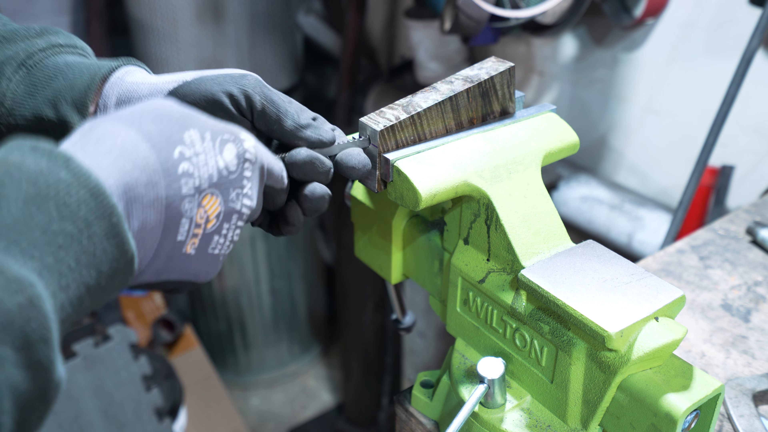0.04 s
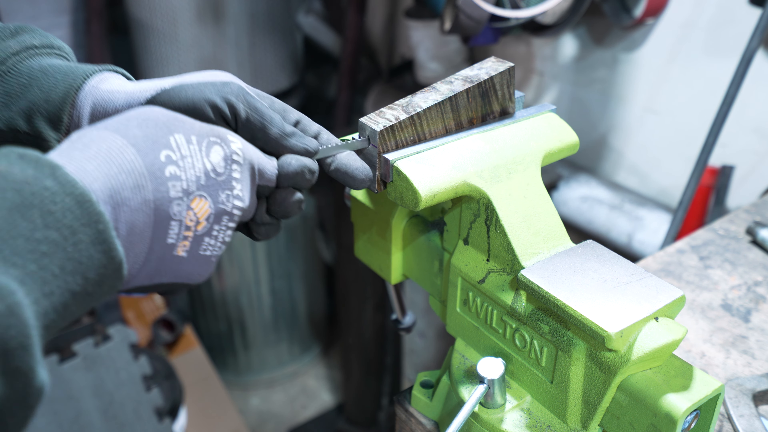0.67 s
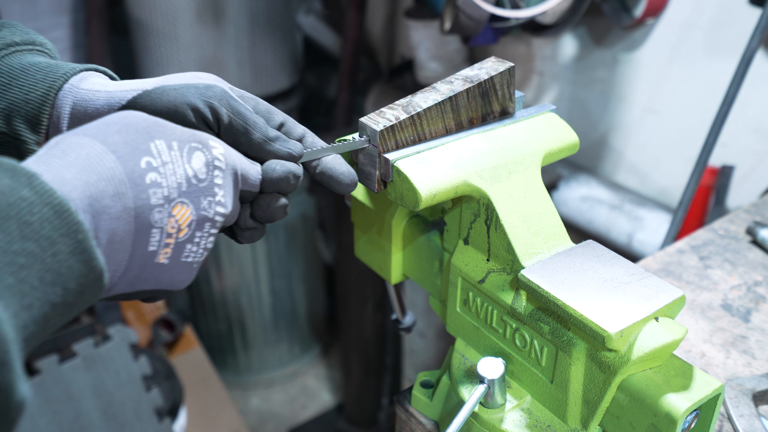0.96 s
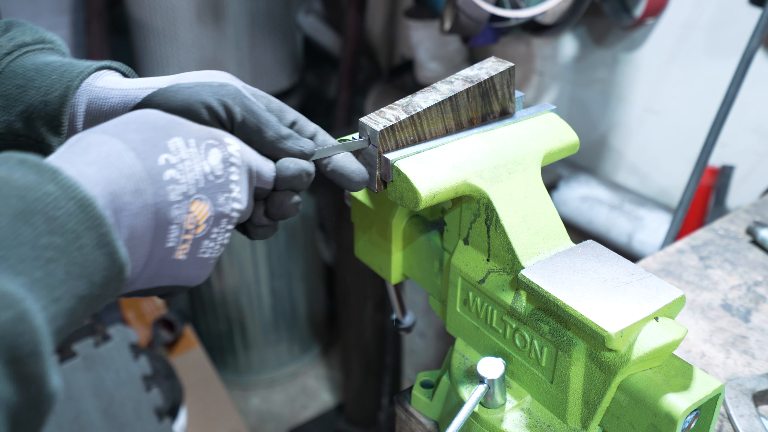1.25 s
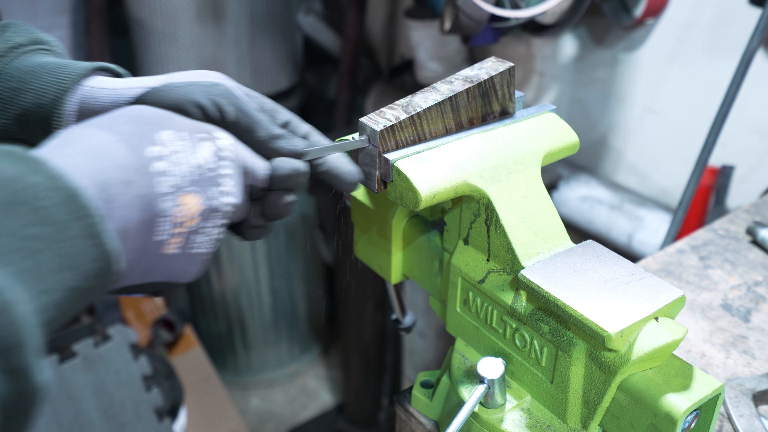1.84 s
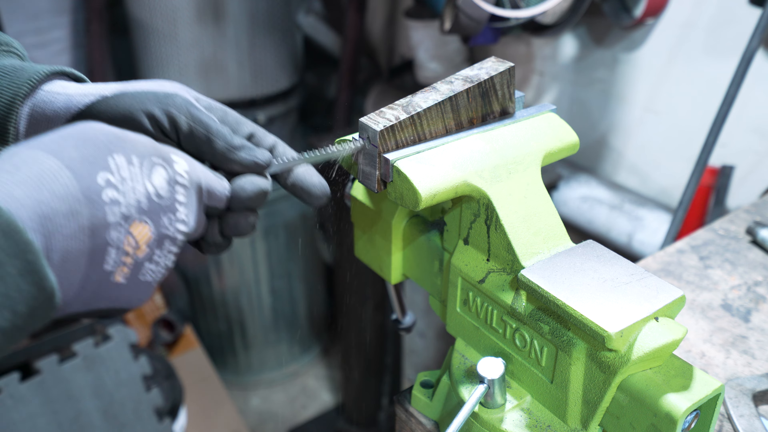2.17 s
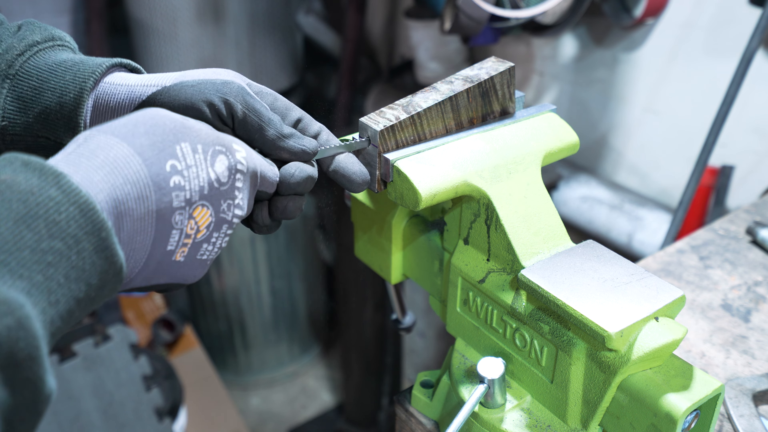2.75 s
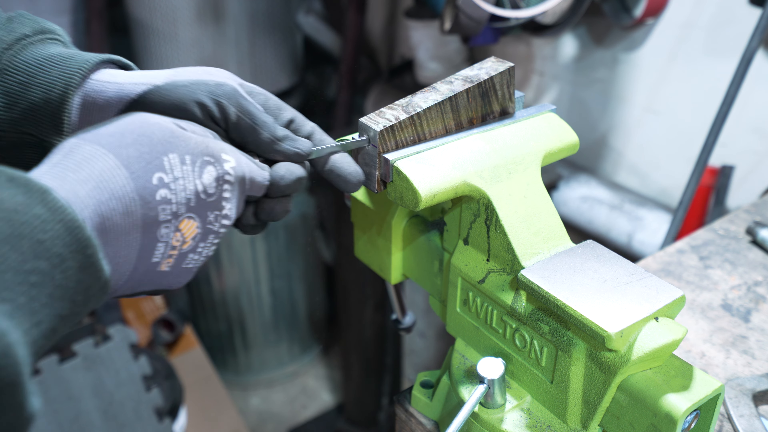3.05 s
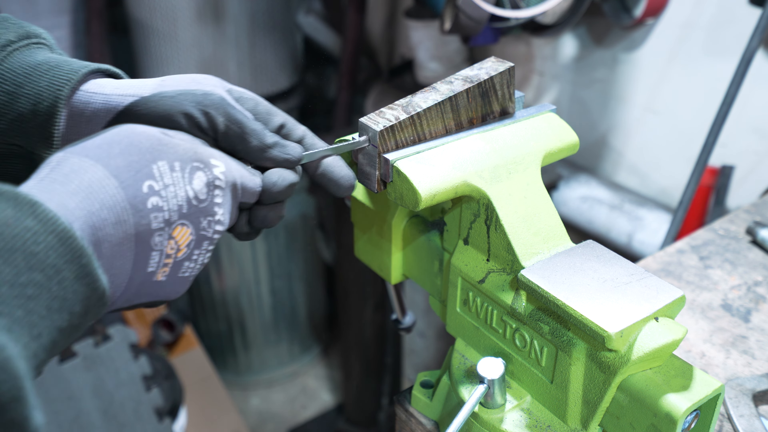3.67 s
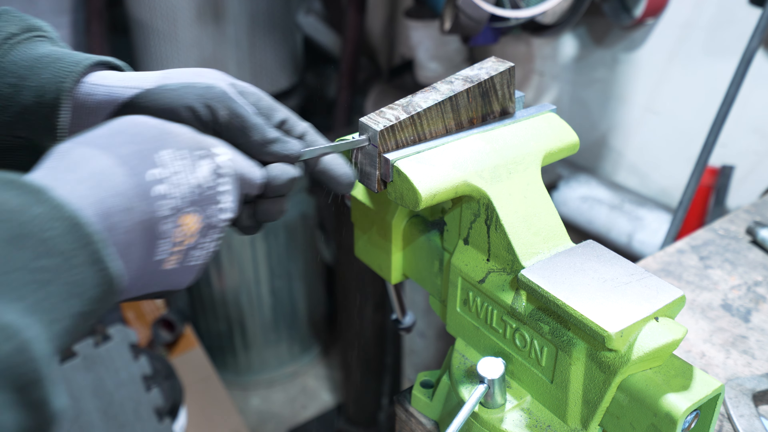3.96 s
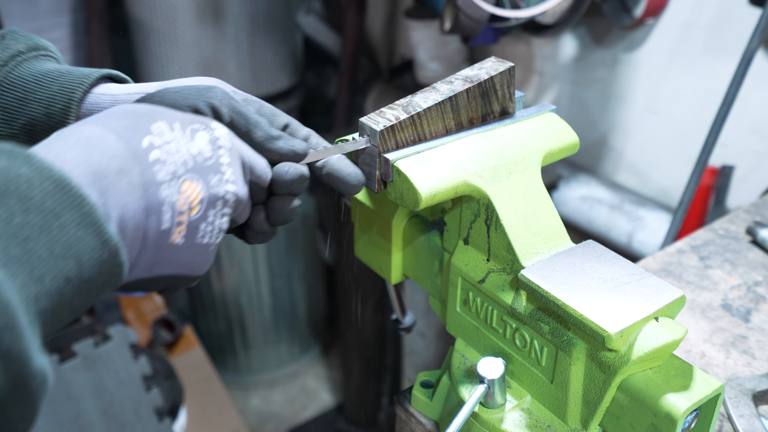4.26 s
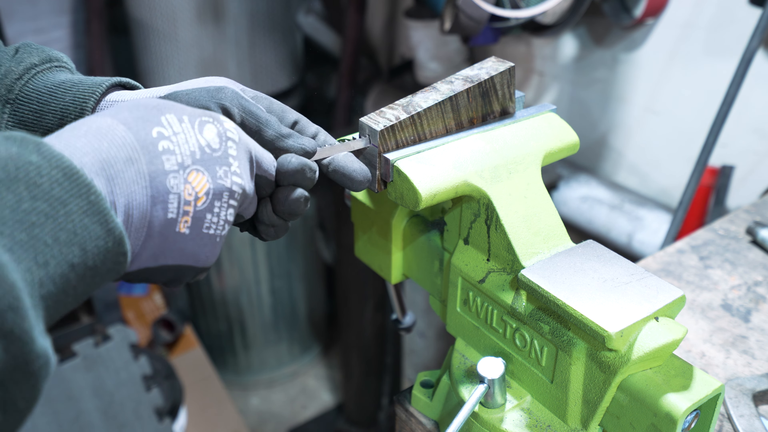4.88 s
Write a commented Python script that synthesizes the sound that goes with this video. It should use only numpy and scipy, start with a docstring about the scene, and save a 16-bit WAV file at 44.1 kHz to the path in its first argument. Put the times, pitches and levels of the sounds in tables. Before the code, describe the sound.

A small toothed hand tool rasps back and forth in a hole in a wooden block held in a bench vice, about five scratchy pushes a second. It jams with dull knocks and faint creaks while the bench rumbles softly. The strokes pause midway with two small snaps, resume, then weaken amid a few ticks and a sharp snap. The workshop is small and quiet, with faint microphone hiss.

```python
"""Broaching a wooden block

A small hand broach rasps in a hole in a block held in a bench vice: about five pushes a second, with
lighter pulls between. Its teeth tear fibres, which hiss and excite the modes of shank, block and vice.
The tool creaks, jams and knocks; the bench thuds and rumbles. A few snaps and ticks fall midway and near
the end. The workshop is small and quiet; the microphone hisses and whines faintly."""
import sys
import numpy as np
from scipy import signal
from scipy.fft import rfft, irfft
from scipy.io import wavfile

SR = 44100
rng = np.random.default_rng(int(sys.argv[2]) if len(sys.argv) > 2 else 0)


def dump(signal):
    """Clip the signal to [-1, 1] and save it as 16-bit WAV at the path in sys.argv[1]."""
    limited = np.clip(np.atleast_2d(signal).T, -1, 1)
    pcm = np.round(limited * 32767).astype(np.int16)
    wavfile.write(sys.argv[1], SR, pcm)


N = 225425
TIME = np.arange(N) / SR


# cutting pushes: t/s, hold/s, rasp level/dB, hiss/dB re rasp, vice shudder/dB re rasp
PUSHES = [(0.031, 0.0064, -64, 2.5, 13.5), (0.722, 0.033, -57, -8, 15), (0.905, 0.02, -54, -6, 11),
          (1.093, .014, -49.5, -9.5, 9), (1.284, 0.025, -55, -9, 12.5), (1.463, 0.023, -53.5, -8, 8.5),
          (1.657, 0.035, -52.5, -5, 11.5), (1.859, 0.033, -50, -2.5, 10), (2.081, 0.04, -55.5, -3, 1),
          (2.65, 0.026, -60, -7.5, 6.5), (3.058, 0.023, -52.5, -6.5, 13.5), (3.247, 0.04, -59.5, -5, 10),
          (3.446, 0.041, -54, -7, 11), (3.649, 0.055, -54, -6, 12), (3.867, 0.032, -50.5, -4.5, 6.5),
          (4.092, 0.057, -63.5, -2.5, 5.5), (4.416, 0.0066, -68, 0, 12.5), (4.569, 0.035, -70, -6, 13.5),
          (4.775, 0.0073, -66.5, -1.5, 10.5), (4.957, 0.028, -61, -11, 3.5)]
# lighter pulls back: t/s, rasp level/dB
PULLS = [(0.805, -71), (1.008, -64), (1.193, -61.5), (1.38, -65), (1.563, -62), (1.755, -61), (1.968, -56),
         (2.82, -70.5), (2.955, -66.5), (3.15, -62.5), (3.355, -64), (3.552, -62), (3.76, -59),
         (3.976, -59.5), (4.225, -68), (5.055, -73)]
# a tooth catches and a bundle of fibres cracks at once: t/s, rasp level/dB, hiss/dB re rasp
CRACKS = [(0.917, -45, -11), (1.107, -49, -8), (1.302, -47.5, -8), (1.481, -48, -5.5), (2.226, -53.5, -10),
          (2.654, -53.5, -14), (2.863, -60.5, -5), (3.076, -46, -3), (3.368, -56, -15), (3.477, -54, -6),
          (3.897, -43.5, -15)]
def bites():
    """Incoherent sources add in power: the envelopes of rasp, fibre hiss and vice shudder."""
    pull_hiss_db, pull_shudder_db, crack_shudder_db = -4.5, 9.5, 7  # re rasp
    shudder_lag_s = 0.0031  # the vice builds up after the teeth bite
    events = []
    for at, hold, *levels in PUSHES:
        depth_db = np.interp(TIME, [at, at + hold], [-2, 0])  # the teeth dig deeper; the hiss stays level
        events.append((swell(at, 0.0086, hold, 0.014), depth_db, *levels))
    events += [(swell(at, 0.014, 0.012, 0.03), 0, db, pull_hiss_db, pull_shudder_db) for at, db in PULLS]
    events += [(swell(at, 0.0013, 0, 0.011), 0, db, hiss_db, crack_shudder_db)
               for at, db, hiss_db in CRACKS]
    rasp = hiss = shudder = 0
    for shape, depth_db, db, hiss_db, shudder_db in events:
        cut = shape * undb(db + depth_db) ** 2
        rasp += cut
        hiss += shape * undb(db + hiss_db) ** 2
        shudder += cut * undb(shudder_db) ** 2
    return rasp, hiss, np.interp(TIME - shudder_lag_s, TIME, shudder)


# spectrum of tearing fibres: f/Hz, level/dB
FIBRE_HISS = [(1500, -7), (2750, 2.5), (3100, -0.5), (3400, -6), (4000, -1.5), (5300, 0.5), (6000, 1),
              (8400, 3.5), (9200, -2), (10700, 3.5), (12100, -3.5), (15000, -15.5), (15800, -20)]
# modes of the steel shank: f/Hz, bandwidth/Hz, gain/dB
SHANK_MODES = [(4370, 300, -7.5), (6040, 140, 3), (7180, 80, 3.5), (7950, 870, -33), (10400, 240, -13.5),
               (11200, 340, -5.5), (12900, 3300, -1.5), (15100, 450, -12)]
# modes of the wooden block: f/Hz, bandwidth/Hz, gain/dB
BLOCK_MODES = [(850, 27, 10), (1121, 92, 10.5), (1309, 32, 12.5), (1408, 26, 20), (1554, 128, 16.5),
               (1730, 100, -20), (1650, 12, 4.5), (2100, 27, -38), (2290, 170, -21), (2830, 230, -40)]
def scraping():
    """Forced vibration: tearing fibres hiss and drive the modes of shank, block and vice."""
    rasp, hiss, shudder = bites()
    grip = chatter(hz=240, depth_db=1.5) * chatter(hz=71.5, depth_db=1)
    hiss_gain = grip * np.sqrt(hiss)
    fibres = hiss_gain * unit(colour(tearing(rate_hz=2400, spread_db=3, smooth=0.83), FIBRE_HISS))
    shank = play(hiss_gain * tearing(rate_hz=2300, spread_db=8, smooth=0.18), ring(SHANK_MODES))
    teeth = grip * tearing(rate_hz=1500, spread_db=2, smooth=0.78)
    block = soften(play(teeth * np.sqrt(rasp), ring(BLOCK_MODES)), hz=2650, order=7)
    vice = play(teeth * np.sqrt(shudder), vice_response(thud_hz=459, thud_width_hz=150, thud_db=-3.5))
    return undb(-1.3) * fibres + undb(-5) * shank + undb(-2.36) * block + undb(-4) * vice


def tearing(rate_hz, spread_db, smooth):
    """Shot noise: fibres give way in random clicks of unequal size, over smooth rubbing; rms 1."""
    breaks = rng.random(N) < rate_hz / SR
    size = np.minimum(rng.exponential(size=N), 4)
    rub = rng.standard_normal(N)
    clicks = breaks * undb(spread_db * size) * rng.choice([-1, 1], N)
    return unit(unit(clicks) + smooth * rub)


def chatter(hz, depth_db):
    """Stick-slip friction: the uneven grip modulates the amplitude at random."""
    flutter = unit(soften(rng.standard_normal(N), hz))
    return unit(undb(depth_db * flutter))


# modes of the vice: f/Hz, bandwidth/Hz, gain/dB
VICE_MODES = [(155.5, 17, -2.5), (231, 34, -2), (331, 26, 6), (334.2, 37, 11), (459.2, 12, 8.5),
              (528.5, 35, 5), (540, 57, -16), (652, 30, -46), (855, 57, -3), (860, 700, -33)]
def vice_response(thud_hz, thud_width_hz, thud_db):
    """Structure-borne delay: the vice rings at once, and a round thud follows by way of the bench."""
    bench_lag_s = 0.008624
    thud = resonate(signal.unit_impulse(SR // 4), thud_hz, thud_width_hz)
    thud = soften(resonate(thud, thud_hz, thud_width_hz), hz=758, order=5)
    age = TIME[:len(thud)]
    late = np.interp(age - bench_lag_s, age, thud / np.linalg.norm(thud), left=0)
    response = soften(ring(VICE_MODES), hz=1746, order=4) + undb(thud_db) * late
    return response / np.linalg.norm(response)


# the tool jams in the hole: t/s, level/dB, contact time/s
KNOCKS = [(.045, -54, .0005), (0.327, -57.5, 0.00024), (.935, -38, 0.00033), (1.119, -40.5, 0.00044),
          (1.21, -32, 0.0017), (1.408, -32.5, 0.0015), (1.485, -40.5, 0.00037), (1.495, -32, 0.0003),
          (1.6701, -28, 0.00026), (1.712, -39, 0.0011), (1.787, -42, 0.00057), (1.995, -31.5, 0.0013),
          (2.133, -48, 0.00038), (2.2189, -27.5, 0.00036), (2.236, -39, .0004), (2.375, -56, 0.0007),
          (2.866, -44, 0.00016), (2.955, -33, 0.0018), (3.169, -40, 0.00055), (3.3683, -29.5, 0.00032),
          (3.485, -33, 0.0008), (3.566, -30.5, 0.00056), (3.667, -36, 0.00051), (3.786, -40.5, 0.0011),
          (4.0102, -34, 0.001), (4.433, -39.5, 0.0021), (4.785, -42.5, 0.0017), (5.063, -41.5, 0.00075)]
def knocking():
    """Impulse excitation: each jam is one short push on the vice."""
    return undb(2) * strike(KNOCKS, vice_response(thud_hz=401, thud_width_hz=440, thud_db=3.5))


# dull ticks with a soft thump: t/s, level/dB, contact time/s
TICKS = [(4.3674, -37.5, 0.00025), (4.3932, -28, 0.00032)]
# their modes: f/Hz, bandwidth/Hz, gain/dB
TICK_MODES = [(74, 75, 7.5), (150, 200, 4.5), (1190, 370, 2), (1780, 630, -29)]
# snaps, like splinters breaking: t/s, level/dB, contact time/s
SNAPS = [(2.452, -43, 0.00046), (2.508, -40, 0.00048), (4.6546, -27, 0.000052), (4.6566, -38, 0.000076),
         (4.6642, -51, .0002)]
# their modes: f/Hz, bandwidth/Hz, gain/dB
SNAP_MODES = [(2710, 114, 3.5), (3030, 270, 4.5), (6550, 3500, -14), (9400, 780, -10), (12900, 550, -12)]
def clicking():
    """Heavy damping keeps these taps short; a source as small as a splinter radiates little bass."""
    splinter = ring(SNAP_MODES)
    bass = soften(splinter, hz=1500, order=1)
    return strike(TICKS, ring(TICK_MODES)) + strike(SNAPS, splinter - bass)


# groans of the vice and squeaks of the shank: centre t/s, half length/s, f/Hz, level/dB
CREAKS = [(0.055, 0.021, 336.8, -53), (0.762, 0.035, 346.5, -47.5), (0.961, 0.016, 344, -46.5),
          (1.307, 0.013, 516, -46.5), (1.662, 0.011, 10600, -60), (1.846, .012, 10400, -65),
          (1.96, 0.03, 8100, -70), (2.663, 0.017, 10650, -64), (2.669, 0.031, 342, -48),
          (2.839, 0.028, 361.7, -54), (3.314, 0.013, 289, -50), (3.868, 0.018, 10660, -57.5),
          (3.988, 0.015, 10600, -68), (4.595, 0.019, 339, -55.5), (4.799, 0.014, 328.7, -59),
          (4.978, 0.011, 519, -51.5)]
def creaking():
    """Self-excited oscillation: stick-slip locks onto a resonance; the pitch wavers with the grip."""
    wavering_time = np.cumsum(1 + 0.031 * unit(soften(rng.standard_normal(N), hz=211))) / SR
    grip = chatter(hz=160, depth_db=5.5)
    tones = 0
    for at, half_length, hz, db in CREAKS:
        bell = np.exp(-np.minimum(((TIME - at) / half_length) ** 2, 20))
        tones += undb(db) * np.sqrt(2) * bell * np.sin(2 * np.pi * (hz * wavering_time + rng.random()))
    return grip * tones


# how hard the hands work the bench: t/s, rumble level/dB
EFFORT = [(0, -62), (.08, -59.5), (.2, -79), (.33, -72.5), (.68, -90), (.73, -58), (1.38, -54),
          (1.54, -52.5), (2.04, -56), (2.44, -71), (2.88, -63.5), (3.15, -54), (3.9, -53), (4.42, -64.5),
          (4.52, -76), (4.6, -62), (4.78, -66.5), (5.11, -60.5)]
# modes of the bench: f/Hz, bandwidth/Hz, gain/dB
BENCH_MODES = [(54, 6.6, -16.5), (90.3, 25, -5.5), (103.5, 14, 9), (141, 25, 3), (144.3, 15, 6),
               (190, 11, 0.5)]
def rocking(sway_hz, sway_width_hz):
    """Random forcing of low modes: the hands make the bench rumble and sway; blows jolt it further."""
    rumble = unit(soften(play(rng.standard_normal(N), ring(BENCH_MODES)), hz=275, order=4))
    sway = unit(soften(resonate(rng.standard_normal(N), sway_hz, sway_width_hz), hz=71))
    effort = undb(curve(EFFORT))
    jolt_power = sum(undb(db - 23) ** 2 * swell(at, attack_s=0.0085, hold_s=0, release_s=0.047)
                     for at, db, _ in KNOCKS + TICKS)
    return np.sqrt(effort ** 2 + jolt_power) * rumble + undb(-5) * effort * sway


# the tool slides between bites: t/s, groan level/dB, rub level/dB
SLIDE = [(0, -72, -71.5), (.41, -93, -100), (.45, -66, -77), (.69, -73.5, -95), (.8, -62, -72.5),
         (1.8, -61, -64), (2.2, -73, -61), (2.4, -81.5, -79), (2.64, -61, -66), (2.82, -62, -78.5),
         (3.4, -64.5, -68), (4.22, -60.5, -66), (4.55, -70, -81), (5.11, -65, -76)]
# modes of the groaning vice: f/Hz, bandwidth/Hz, gain/dB
GROAN_MODES = [(355, 39, 4.5), (356, 110, -12)]
# spectrum of dry rubbing on wood: f/Hz, level/dB
WOOD_RUB = [(500, -4), (1000, -1), (1550, -0.5), (2000, -2.5), (2900, -6), (3300, -12), (6000, -18)]
# gloves brush along the tool: t/s, level/dB
GLOVES = [(0, -75), (.7, -92), (1.9, -78), (2.2, -91), (2.4, -86), (3.8, -81), (4.15, -72), (4.45, -71.5),
          (4.7, -73), (5.11, -105)]
# their spectrum: f/Hz, level/dB
GLOVE_HISS = [(2500, -16.5), (5500, -9.5), (6700, -3), (7500, -5), (11000, -6), (15500, -6.5)]
def sliding():
    """Sliding friction makes noise: the vice groans softly, the wood rubs and the gloves brush."""
    friction = tearing(rate_hz=380, spread_db=3.5, smooth=0.44)
    groan = unit(soften(play(friction, ring(GROAN_MODES)), hz=690, order=4))
    rub = chatter(hz=60, depth_db=3.5) * unit(colour(rng.standard_normal(N), WOOD_RUB))
    gloves = unit(colour(rng.standard_normal(N), GLOVE_HISS))
    rub_db = curve(SLIDE, column=2) - 1.5
    return undb(curve(SLIDE)) * groan + undb(rub_db) * rub + undb(curve(GLOVES)) * gloves


# spectrum of the room's tail: f/Hz, level/dB
ROOM_COLOUR = [(60, -19), (150, -18), (550, 0.5), (1000, -3.5), (2500, -2), (6000, -3), (15000, -26)]
def workshop(x, t60_s, wet_db, gap_s):
    """Reverberation: a diffuse tail, duller than the direct sound, decays exponentially."""
    age = TIME[:SR // 2]
    tail = colour(rng.standard_normal(len(age)), ROOM_COLOUR)
    onset = np.clip(age / gap_s - 1, 0, 1)
    decay = onset * np.exp(-np.log(1000) * age / t60_s)
    return x + undb(wet_db) * play(x, tail * decay / np.linalg.norm(decay))


# spectrum of the quiet room: f/Hz, level/dB
ROOM_AIR = [(20, 1), (40, 1.5), (62, -7), (130, -6.5), (240, -23), (450, -8.5), (750, -17), (1500, -18),
            (3000, -23.5), (6000, -20.5), (11000, -19.5), (15500, -21.5)]
# spectrum of the microphone hiss: f/Hz, level/dB
MIC_HISS = [(100, -3), (1000, -20), (3000, -14), (7000, -3.5), (15500, -3)]
# thin electronic whine: harmonic number, rms level/dB
WHINE = [(2, -88.5), (3, -88.5), (4, -88.5), (5, -87.5), (6, -87.5), (7, -87.5), (8, -87.5), (9, -87.5),
         (10, -91), (11, -86), (12, -90.5), (13, -90), (14, -89), (15, -91.5), (16, -91.5), (17, -89.5),
         (18, -101)]
def background(whine_hz):
    """Noise floor: room air, a harmonic whine, and microphone hiss in antiphase between the channels."""
    air = undb(-68.5) * unit(colour(rng.standard_normal(N), ROOM_AIR))
    hiss = undb(-72) * unit(colour(rng.standard_normal(N), MIC_HISS))
    whine = sum(undb(db) * np.sqrt(2) * np.sin(2 * np.pi * (k * whine_hz * TIME + rng.random()))
                for k, db in WHINE)
    return air + whine + np.array([hiss, -hiss])


def strike(events, response):
    """Impact: Gaussian force pulses drive a body; a longer contact excites less treble."""
    force = 0
    for at, db, contact_s in events:
        pulse = np.exp(-2 * np.minimum((2 * (TIME - at) / contact_s) ** 2, 20))
        force += undb(db) * pulse / pulse.sum()
    return play(force, response / np.abs(response).max())


def ring(modes):
    """Modal superposition: the impulse response of a set of resonances, with energy 1."""
    tap = signal.unit_impulse(SR // 4)
    response = sum(undb(db) * resonate(tap, hz, width) for hz, width, db in modes)
    return response / np.linalg.norm(response)


def resonate(x, hz, width_hz):
    """Damped resonance: two poles, gain 1 at the centre."""
    return signal.lfilter(*signal.iirpeak(hz, hz / width_hz, fs=SR), x)


def play(force, response):
    """Convolution: a force drives a linear system."""
    return signal.fftconvolve(force, response)[:N]


def colour(x, points):
    """Spectral shaping by (f/Hz, level/dB) points, joined over log frequency."""
    hz, db = np.transpose(points)
    bins = np.maximum(np.fft.rfftfreq(len(x), 1 / SR), 1)
    gain = undb(np.interp(np.log(bins), np.log(hz), db))
    return irfft(rfft(x) * gain, len(x))


def soften(x, hz, order=2):
    """Low-pass filtering."""
    return signal.sosfilt(signal.butter(order, hz, fs=SR, output="sos"), x)


def swell(at, attack_s, hold_s, release_s):
    """Exponential growth and decay: power reaches 1 at the given time, holds and dies away."""
    away = np.maximum((at - TIME) / attack_s, (TIME - at - hold_s) / release_s)
    return np.exp(-2 * np.clip(away, 0, 20))


def curve(rows, column=1):
    """Linear interpolation of one table column in time."""
    rows = np.array(rows)
    return np.interp(TIME, rows[:, 0], rows[:, column])


def undb(db):
    """Level to amplitude ratio."""
    return 10 ** (np.asarray(db) / 20)


def unit(x):
    """Normalisation to rms 1."""
    return x / np.sqrt(np.mean(x ** 2))


def scene():
    """Superposition: all the work lies straight ahead, so it reaches both channels alike."""
    work = workshop(scraping() + knocking(), t60_s=0.39, wet_db=-6.5, gap_s=0.0033)
    clicks = workshop(clicking(), t60_s=0.14, wet_db=-13, gap_s=0.0013)
    friction = creaking() + sliding()
    bench = rocking(sway_hz=28.4, sway_width_hz=3.9)
    return work + clicks + friction + bench + background(whine_hz=605.5)


def record(dry):
    """Band limiting: the recorder cuts the top steeply."""
    top_hz = 15850
    return signal.sosfilt(signal.ellip(10, .1, 70, top_hz, fs=SR, output="sos"), dry)


dry = scene()
out = record(dry)
dump(out)
```